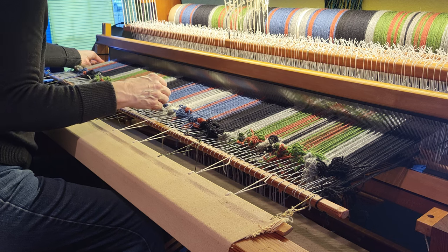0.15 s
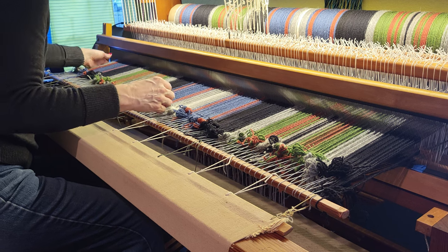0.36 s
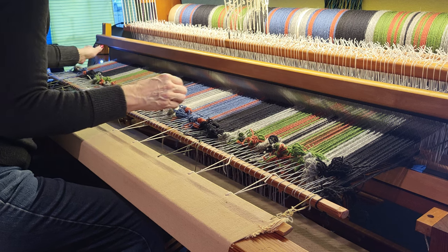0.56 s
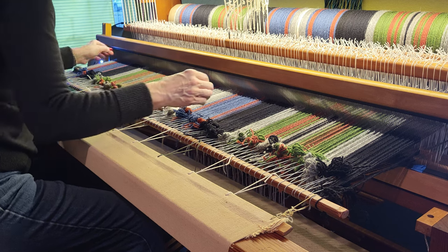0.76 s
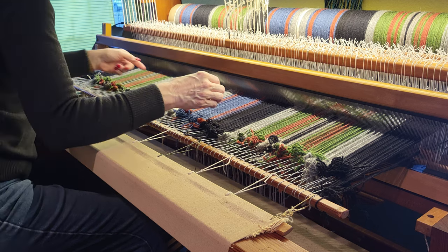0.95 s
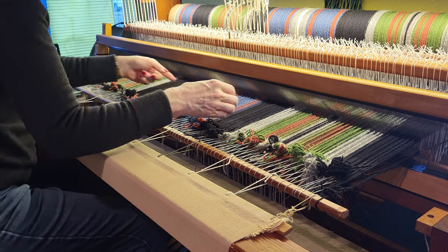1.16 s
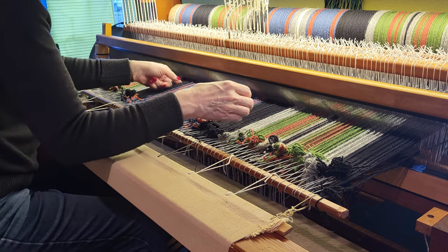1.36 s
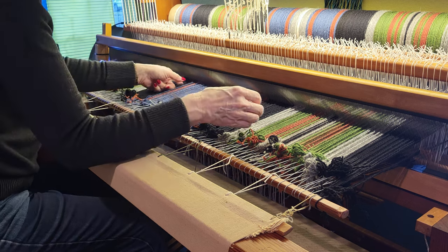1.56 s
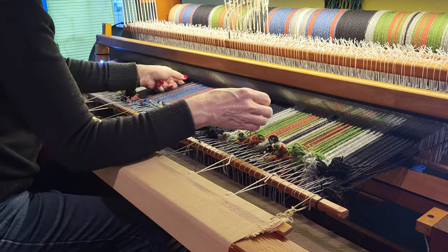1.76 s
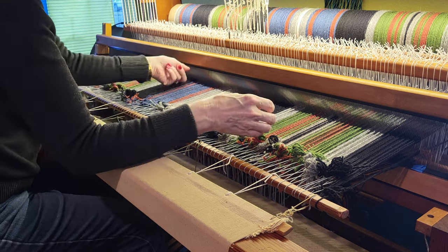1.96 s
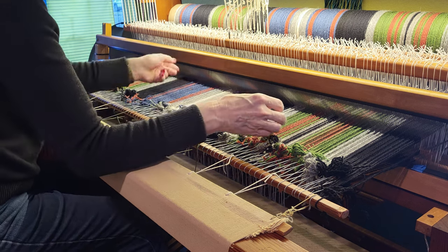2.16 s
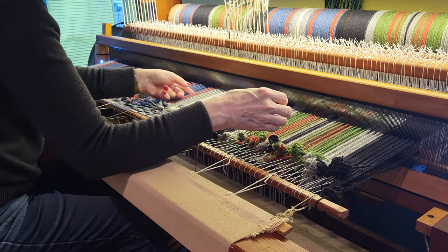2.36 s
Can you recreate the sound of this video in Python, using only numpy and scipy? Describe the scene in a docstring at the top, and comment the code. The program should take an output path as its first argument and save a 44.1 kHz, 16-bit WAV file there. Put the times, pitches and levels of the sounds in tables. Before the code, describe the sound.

Close by in a small quiet indoor space, loom shafts strike and rattle to rest, a heel thumps softly on floorboards, cloth faintly brushes, and the shafts clack again, over low rumble and faint hiss.

```python
"""A quiet room with a floor loom: twice a treadle is pressed, and the shafts clack and bounce to rest.
Each clack rings the damped modes of the shaft bars and jingles the steel heddles as shaped noise.
Below them the wooden frame knocks and hums, a heel thumps the floor boards and cloth brushes softly.
Dense decaying noise gives the walls' answer; a low rumble and a faint hiss fill the room."""
import sys
import numpy as np
from scipy import signal
from scipy.fft import rfft, irfft, next_fast_len
from scipy.io import wavfile
from scipy.ndimage import uniform_filter1d

SR = 44100
rng = np.random.default_rng(int(sys.argv[2]) if len(sys.argv) > 2 else 0)


def amp(db):
    return 10 ** (np.asarray(db, float) / 20)


def write(x):
    x = np.atleast_2d(x).T
    wavfile.write(sys.argv[1], SR, np.round(np.clip(x, -1, 1) * 32767).astype(np.int16))


N = 105751  # length [samples]

# relative noise spectrum of the jingling heddles: (frequency [Hz], density [dB per Hz])
HEDDLES = [(1050, -33.5), (1350, -0.5), (1600, -8), (2600, -5), (4800, -11), (5900, -3), (8000, -14),
           (9500, -17), (11000, -33.5), (13000, -16), (14600, -38.5), (16000, -71)]
# likeness of the two ears in diffuse sound: (frequency [Hz], left-right correlation [-1 to 1])
LIKENESS = [(150, 0.89), (900, 0.072), (15000, 0)]

FULL_BLOW_DB = -23.5  # reference level: softer blows are duller and jingle less
STEADY_DB = 1.5  # level scatter of the low shaft modes and the floor boards


def unit(x):
    """Normalisation by mean power: the result has rms 1."""
    return x / np.sqrt(np.mean(x ** 2) + 1e-20)


def along(points, hz):
    """Interpolation of (frequency [Hz], value) points on a logarithmic frequency axis."""
    f, v = np.transpose(points)
    return np.interp(np.log(hz + 1), np.log(f + 1), v)


def filtered(x, response):
    """Linear filtering: the spectrum is multiplied by a response of frequency."""
    n = x.shape[-1]
    m = next_fast_len(n + 8192)
    spectrum = rfft(x, m) * response(np.fft.rfftfreq(m, 1 / SR))
    return irfft(spectrum, m)[..., :n]


def rush(spectrum, likeness):
    """Diffuse noise of rms 1: the balance of mid and side sets the correlation of the ears."""
    def mid_side(hz):
        angle = np.arccos(np.clip(along(likeness, hz), -1, 1)) / 2
        return amp(along(spectrum, hz)) * [np.cos(angle), np.sin(angle)]

    mid, side = filtered(rng.standard_normal((2, N)), mid_side)
    return unit(np.array([mid + side, mid - side]))


def burst(t, length):
    """Contact envelope: rattling fades from the first touch, ever faster, over about its length [s]."""
    phase = t / max(length, 1e-4)
    return np.exp(-phase ** 2 / 2 - phase)


def ring(modes, colour_db, spread, t, scatter_db=4):
    """Modal superposition: damped sines, whose phases differ by spread [rad] between the ears."""
    detune = 0.009  # typical shift of a mode, as a share of its frequency
    hz, db, t60 = np.transpose(modes)[:, :, None]
    luck = rng.standard_normal((len(modes), 4))
    hz = hz * (1 + detune * luck[:, 3:])
    size = amp(db + colour_db(hz) + scatter_db * luck[:, :1] - 60 * t / t60)
    phase = 2 * np.pi * hz * t + np.pi * luck[:, 1:2]
    ear_shift = spread / 2 * np.sign(luck[:, 2:3])
    return np.array([(size * np.sin(phase + ear * ear_shift)).sum(0) for ear in (-1, 1)])


def struck(modes, colour_db, spread, push, t):
    """Forced response: a blow and small contacts convolve the modes; the first 40 ms have rms 1."""
    blow = 0.96  # first contact relative to the norm of the rattle
    push = push / np.linalg.norm(push) + blow * (t == 0)
    out = signal.fftconvolve(ring(modes, colour_db, spread, t), push[None], axes=1)[:, :len(t)]
    return out / np.sqrt(np.mean(out[:, :SR // 25] ** 2))


def add(out, s, part):
    """Superposition: a part is summed in from time s [s]."""
    spot = out[:, max(round(s * SR), 0):][:, :part.shape[1]]
    spot += part[:, :spot.shape[1]]


def clack(db, low_db, pitch_hz, length, t):
    """Impact excitation: a short rattle rings the bars and heddles; soft or woody blows are duller."""
    # strongest modes of the shaft bars: (frequency [Hz], level [dB], t60 before damping [s])
    low_modes = [(1406.3, 1, 0.12), (1601, -2, 0.19), (1662, -7, 0.1), (1777, -0.5, 0.03)]
    # the other bar modes: (frequency [Hz], level [dB], t60 [s])
    bar_modes = [(1940, -21, 0.071), (2158, 3.5, 0.038), (2560, 1, 0.11), (2716, -4, 0.11),
                 (2970, -1, 0.045), (3170, -6, 0.045), (3883, 2, 0.036), (4557, -2, 0.028),
                 (5280, -1.5, 0.091), (5502, 10.5, 0.012), (6090, -4, 0.023), (7590, -4, 0.12)]
    dulling = 0.245  # dB lost near 4 kHz for each dB softer
    favour_db, favour_octaves = 7.5, 0.031  # lift at the favoured pitch and its width
    free_s, let_go = 0.041, 0.33  # low modes ring free this long, then are damped towards this share
    jingle_db, jingle_t60, quieter = -2, 0.11, 0.4  # quieter: dB of jingle lost for each dB softer

    def colour_db(hz):
        softness = min(db - FULL_BLOW_DB - max(low_db, 0), 0)
        octaves = np.log2((hz + 1) / pitch_hz)
        lift = favour_db * np.exp(-(octaves / favour_octaves) ** 2)
        return dulling * softness * ((hz + 1) / 4000) ** 2.9 + lift

    grit = rng.standard_normal((3, len(t)))
    low = ring(low_modes, lambda hz: 0, 1.41, t, STEADY_DB)
    low = low * (let_go + np.exp(-(t / free_s) ** 4))
    bars = struck(bar_modes, colour_db, 1.63, grit[0] * burst(t, length), t)
    jingle = unit(filtered(grit[1:3], lambda hz: amp(along(HEDDLES, hz) + colour_db(hz))))
    jingle = jingle * np.maximum(burst(t, length), amp(-60 * t / jingle_t60))
    jingle_level = amp(jingle_db + quieter * min(db - FULL_BLOW_DB, 0))
    onset = 1 - np.exp(-t / 0.001)
    return amp(db - 8.5) * onset * (amp(low_db) * low + amp(-8.0) * bars + jingle_level * jingle)


def creak():
    """Onset of motion: noise swells exponentially as the bars begin to move before each first blow."""
    # first blows: time [s]
    starts = [.344, 1.877]
    rise_s, under_full_blow_db = 0.011, -24
    t = np.arange(N) / SR
    ahead = sum(np.exp(np.minimum(t - s, 0) / rise_s) * (np.arange(N) < s * SR) for s in starts)
    spectrum = HEDDLES[:4] + [(6000, -15.5), (9000, -54.5)]
    return amp(FULL_BLOW_DB + under_full_blow_db) * ahead * rush(spectrum, [(1000, 0.17)])


def shafts():
    """Repeated impact: the shafts creak and clack, high-passed and with the right side brighter."""
    # shafts striking: (time [s], level before a common trim [dB], level of the low modes [dB],
    # favoured pitch [Hz], rattle length [s])
    clacks = [(0.343, -15.5, -7.5, 5670, 0.007), (0.3536, -18, -9, 2820, 0.046),
              (0.3755, -16, -4.5, 8060, 0.054), (0.3922, -21, -10, 2723, 0.014),
              (0.4334, -16.5, -19, 5700, 0.024), (0.4438, -19.5, -42, 2637, 0.0031),
              (0.5238, -20, 6.5, 2120, 0.045), (0.606, -26, -14, 2860, 0.018),
              (0.6182, -26.5, -29, 2860, 0.064), (0.666, -28, -4, 5410, 0.052),
              (0.6908, -26, -8, 2560, 0.025), (0.7851, -26.5, -12.5, 2940, 0.025),
              (0.8396, -37, -7.5, 2600, 0.015), (0.8887, -37, -8, 5370, 0.018),
              (0.958, -38, -6, 2640, 0.021), (1.8762, -14, -1, 2960, 0.016),
              (1.8973, -14.5, -38.5, 5930, 0.0032), (1.9524, -16, -2, 2380, 0.029),
              (2.011, -21.5, -3, 5620, 0.029), (2.0305, -28.5, -0.5, 5280, 0.067),
              (2.054, -20.5, -5, 2670, 0.017), (2.1436, -33.5, -11.5, 5270, 0.011)]
    low_cut_hz, right_tilt_db = 920, 2  # tilt: right over left, dB per octave from 750 to 6000 Hz
    out, t = np.zeros((2, N)), np.arange(SR // 3) / SR
    for s, db, low_db, pitch_hz, length in clacks:
        add(out, s, clack(db, low_db, pitch_hz, length, t))
    out = out + creak()
    out = signal.sosfilt(signal.butter(8, low_cut_hz, "high", fs=SR, output="sos"), out)

    def tilt(hz):
        octaves = np.log2(np.clip(hz / 1500, .5, 4))
        return amp(right_tilt_db / 2 * octaves * np.array([[-1], [1]]))

    return filtered(out, tilt)


def frame(clatter):
    """Modal response and coupling: treadles and lams knock softly, and the shafts shake the frame."""
    # wooden knocks: (time [s], level before filtering [dB], favoured pitch [Hz])
    knocks = [(0.371, -30, 815), (0.389, -34.5, 407), (0.417, -34, 105), (0.486, -35, 312),
              (0.545, -37, 230), (0.675, -39.5, 372), (0.698, -42, 197), (0.848, -46.5, 205),
              (1.126, -45.5, 281.3), (1.419, -62.5, 250), (2.045, -40, 500), (2.11, -48.5, 156.6)]
    # modes of the frame: (frequency [Hz], level [dB], t60 [s])
    frame_modes = [(105, -9.5, 0.023), (162, -10.5, 0.14), (206, -9.5, 0.12), (273, -4.5, 0.036),
                   (353, 11.5, 0.013), (459.5, -4, 0.031), (567.4, -9.5, 0.03), (706.6, 0.5, 0.023),
                   (1067, 0, 0.035)]
    # relative noise spectrum of the humming frame: (frequency [Hz], density [dB per Hz])
    hum = [(120, -16), (250, -1), (500, -5), (900, 1.5), (1300, -19)]
    hum_db = -27.5  # relative to the running rms of the clatter
    push_s, swell_s = 0.03, 0.0094  # a soft contact
    reach_db = 4  # fall one octave away from the favoured pitch
    out, t = np.zeros((2, N)), np.arange(SR // 3) / SR
    for s, db, pitch_hz in knocks:
        push = rng.standard_normal(len(t)) * burst(t, push_s)
        knock = struck(frame_modes, lambda hz: -reach_db * np.log2(hz / pitch_hz) ** 2, 0.68, push, t)
        swelling = knock * (1 - np.exp(-t / swell_s))
        soft = filtered(swelling, lambda hz: 1 / (1 + (hz / (2.5 * pitch_hz)) ** 4))
        add(out, s, amp(db) * soft)
    out = filtered(out, lambda hz: hz ** 2 / (hz ** 2 + 80 ** 2))  # thins the deep bass
    power = uniform_filter1d(np.mean(clatter ** 2, axis=0), SR // 50)
    shaking = np.sqrt(np.abs(power))
    return out + amp(hum_db) * shaking * rush(hum, LIKENESS)


def heel():
    """Low-frequency plate modes: weight shifting on the treadles thumps the floor boards."""
    # thumps: (time [s], level [dB])
    thumps = [(0.398, -41.5), (0.518, -41.5), (0.658, -43), (1.136, -31), (1.955, -43), (2.081, -42.5),
              (2.199, -45), (2.267, -62)]
    # modes of the floor boards: (frequency [Hz], level [dB], t60 [s])
    boards = [(58.2, 3, 0.22), (45.8, -5, .2), (105.2, -7.5, 0.25)]
    out, t = np.zeros((2, N)), np.arange(SR // 2) / SR
    for s, db in thumps:
        thump = ring(boards, lambda hz: 0, 0.15, t, STEADY_DB)
        add(out, s, amp(db) * thump * (1 - np.exp(-t / 0.019)))
    return out


def cloth():
    """Friction noise: sleeves and yarn brush softly, each brush swelling faster than it fades."""
    # brushes: (time [s], length [s], level [dB])
    brushes = [(0.05, 0.019, -67), (1.115, 0.2, -65.5), (2.146, 0.21, -69.5)]
    # relative noise spectrum of brushing: (frequency [Hz], density [dB per Hz])
    rustle = [(700, -13), (2100, -7), (3800, -11.5), (6500, -0.5), (10000, -15.5), (13000, -12),
              (16000, -18)]
    edge_s = 0.02  # scale of the fade; the rise takes a quarter of it
    t, swell = np.arange(N) / SR, np.zeros(N)
    for s, length, db in brushes:
        rise = 1 + np.exp((s - t) / edge_s * 4)
        fall = 1 + np.exp((t - s - length) / edge_s)
        swell += amp(db) / rise / fall
    return swell * rush(rustle, [(1000, 0.056)])


def walls(x):
    """Diffuse reverberation: each frequency decays at its own speed, and the bass is alike in both
    ears. Fresh noise is drawn for the answer twenty times a second, so no single tail colours it all."""
    # decay of the room: (frequency [Hz], t60 [s])
    decay = [(100, 0.88), (600, 0.46), (6000, 0.28), (14000, 0.23)]
    mono_hz, delay_s = 500, 0.007  # the ears grow alike below mono_hz
    out, step = np.zeros_like(x), SR // 20
    for start in range(0, N, step):
        hz, t, z = signal.stft(rng.standard_normal((2, SR * 2 // 3)), SR, nperseg=256)
        wide = (hz / (hz + mono_hz))[:, None]
        z = wide * z + np.sqrt(1 - wide ** 2) * z[0]
        z = z * amp(-60 * t / along(decay, hz)[:, None])
        tail = signal.istft(z, SR, nperseg=256)[1]
        tail = tail / np.linalg.norm(tail[0])
        answer = signal.fftconvolve(x[:, start:start + step], tail, axes=1)
        add(out, start / SR + delay_s, answer)
    return out


def hush():
    """Stationary background noise: a low rumble and a faint hiss share one shaped spectrum."""
    # relative noise spectrum of the quiet room: (frequency [Hz], density [dB per Hz])
    spectrum = [(20, -24.5), (34, -16), (58, -3), (133, -27.5), (442, -38.5), (1350, -45.5), (2560, -43),
                (5130, -48.5), (7200, -38.5), (8500, -51), (15700, -47)]
    return amp(-64.5) * rush(spectrum, LIKENESS)


def scene():
    """Superposition: the loom, its answer from the walls, and the quieter sources add linearly."""
    clatter = shafts()
    loom = clatter + frame(clatter)
    reverberation = amp(-7) * walls(loom)
    return loom + reverberation + heel() + cloth() + hush()


def top_cut(x):
    """Nothing passes above the cut-off."""
    return signal.sosfilt(signal.butter(12, 15810, fs=SR, output="sos"), x)


def record(dry):
    """Unity gain: the finished mix goes to the last stage at its own level."""
    return top_cut(dry)


dry = scene()
out = record(dry)
write(out)
```